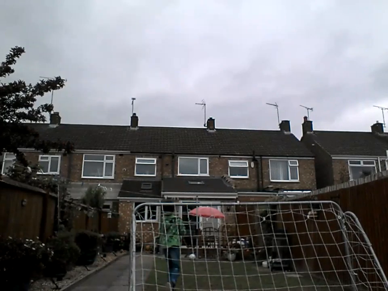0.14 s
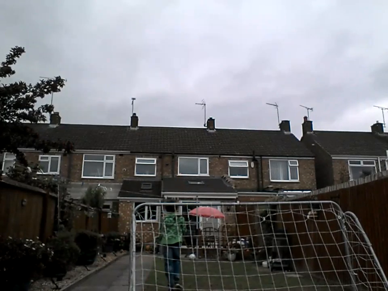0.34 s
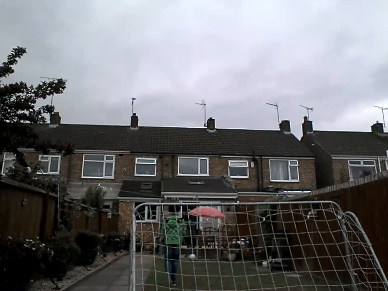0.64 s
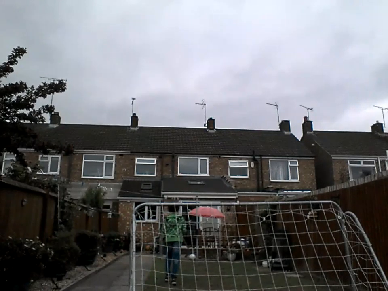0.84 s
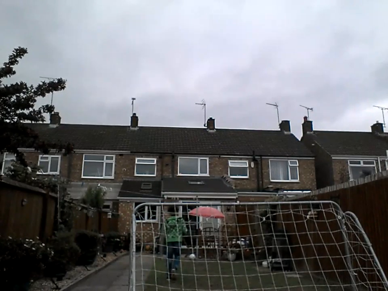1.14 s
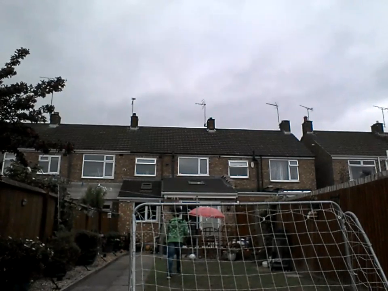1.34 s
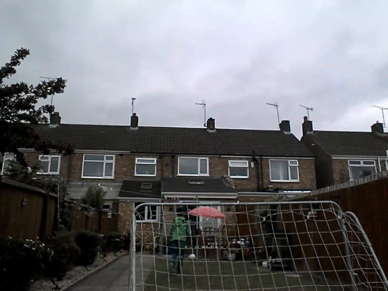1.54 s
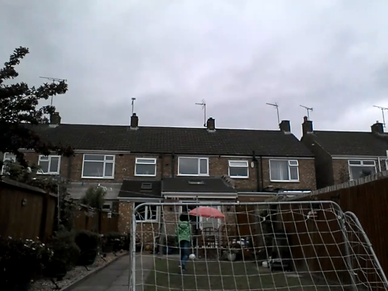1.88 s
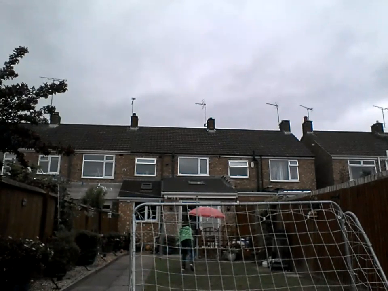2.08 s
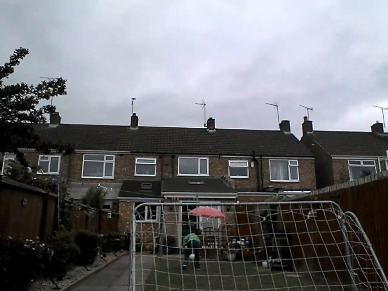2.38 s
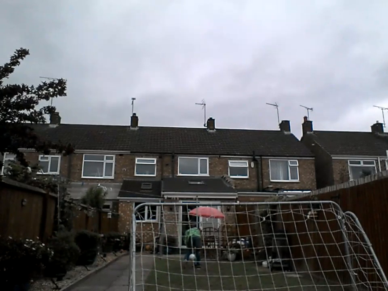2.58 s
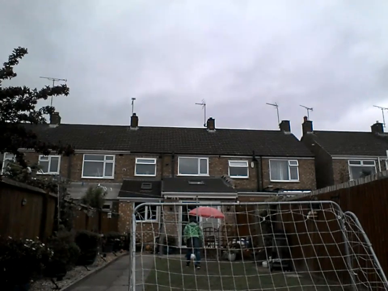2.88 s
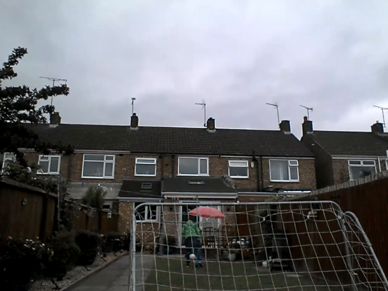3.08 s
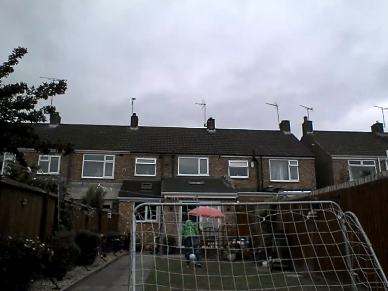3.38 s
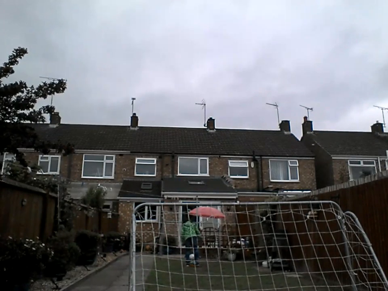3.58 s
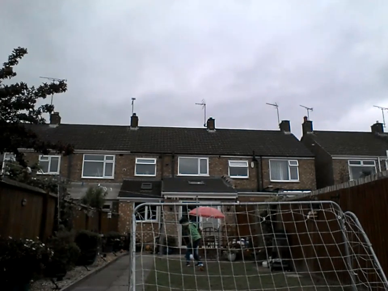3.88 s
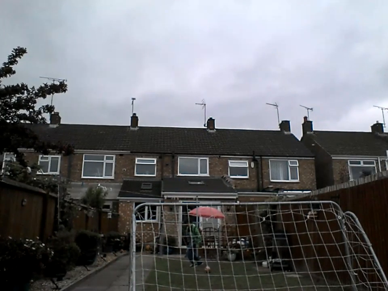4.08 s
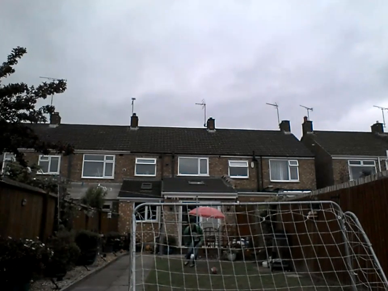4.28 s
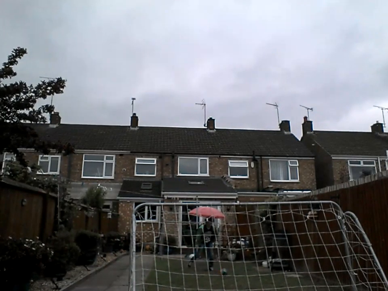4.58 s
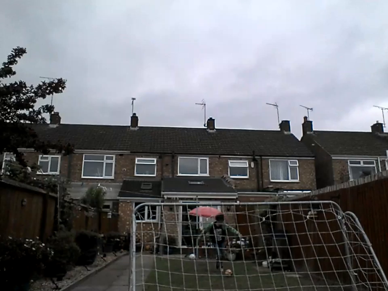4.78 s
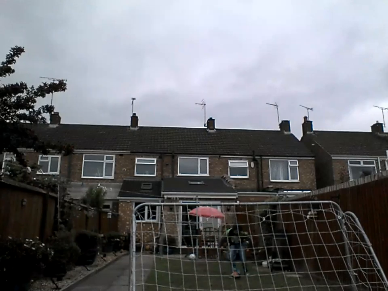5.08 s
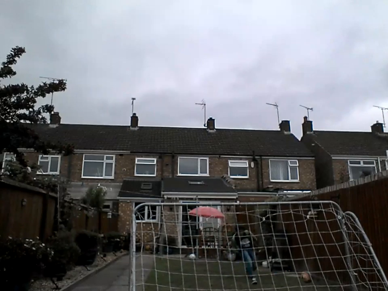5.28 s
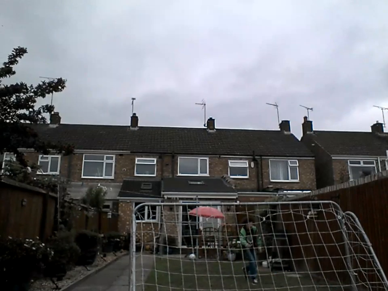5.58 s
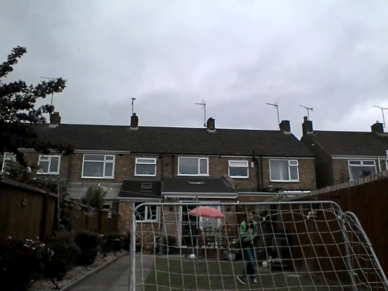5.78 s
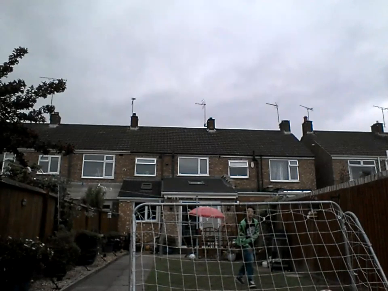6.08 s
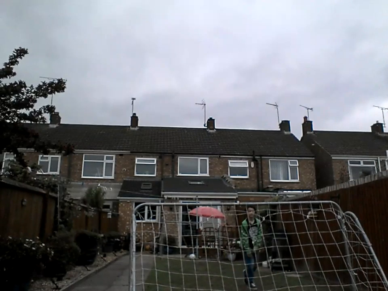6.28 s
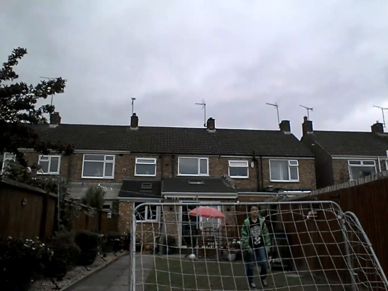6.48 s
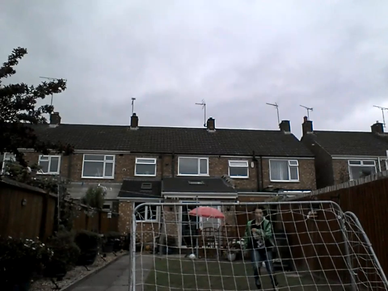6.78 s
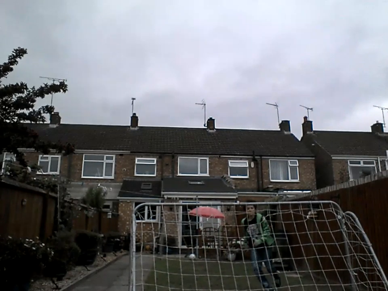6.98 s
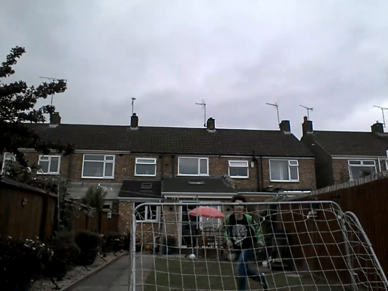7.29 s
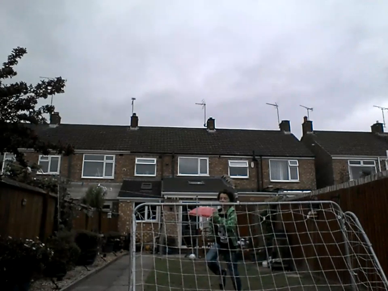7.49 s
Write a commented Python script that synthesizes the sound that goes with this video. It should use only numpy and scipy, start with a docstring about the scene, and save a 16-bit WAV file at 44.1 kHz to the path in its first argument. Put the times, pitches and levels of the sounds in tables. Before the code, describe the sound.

Sparrows chirp over quiet garden ambience, wind buffets the microphone hard, then a ball is kicked, bounces into a net, and light knocks follow.

```python
"""Football in a back garden

The microphone stands just behind the net of a small goal: shaped noise makes wind, traffic and hiss.
A gust buffets the microphone with pressure swings; then a ball is kicked, bounces and drops into the net.
Steps, ball and knocks are bursts of clicks; ball, ground and goal frame also ring as fading sine waves.
Sparrows are sliding whistles, a far vehicle is a stack of harmonics, and fences and house walls echo."""
import sys
import numpy as np
from scipy import signal
from scipy.fft import rfft, irfft, next_fast_len
from scipy.io import wavfile
from scipy.ndimage import uniform_filter1d

SR = 44100
rng = np.random.default_rng(int(sys.argv[2]) if len(sys.argv) > 2 else 0)


def digitize_waveform(pressure):
    """Quantize a signal to 16-bit integers and store it at the path in sys.argv[1].

    Rows of a 2-D input are taken as channels; values are limited to [-1, 1].
    """
    field = np.atleast_2d(pressure).T
    bounded = np.clip(field, -1, 1)
    quanta = np.round(bounded * 32767).astype(np.int16)
    wavfile.write(sys.argv[1], SR, quanta)


N = 336924
TIME = np.arange(N) / SR

# The ball's kick, bounces, net hit and drop, levels before the garden's echoes and filters:
# start_s [s], level_db [dB], hardness_db [dB], rise_s [s], thud_db [dB], thud_tilt_db [dB per octave]
BALL_HITS = [(5.2215, -42.5, -4.5, 0.0008, -31, -1), (5.445, -56, -5, 0.00044, -51, 10.5),
             (5.662, -50, -1.5, 0.0024, -59.5, 11), (5.7051, -42.5, 0.5, 0.00027, -34.5, -5.5),
             (6.397, -53.5, -3, 0.00084, -40, -1)]
# Knocks on the goal frame, before filters: start_s [s], level_db [dB], hardness_db [dB], rise_s [s]
FRAME_KNOCKS = [(6.769, -42.5, 6, 0.00027), (6.779, -53.5, -13.5, 0.0012), (7.031, -44, 1.5, 0.0031),
                (7.208, -51, 0.5, 0.0022), (7.252, -69, 9, 0.00043), (7.317, -55, 0.5, 0.0019)]


def from_db(db):
    """Turn decibels into gain."""
    return 10 ** (np.asarray(db) / 20)


def rms_one(x):
    """Scale to an rms (average strength) of 1."""
    return x / np.sqrt(np.mean(x ** 2) + 1e-20)


def add(out, start_s, sound):
    """Mix a sound in, starting at the given second."""
    at = max(round(start_s * SR), 0)
    out[at:at + len(sound)] += sound[:max(N - at, 0)]


def colour(x, spectrum):
    """Filter to a given spectrum without sounding early (minimum phase); white noise keeps its level."""
    size = next_fast_len(N + SR // 4) * 2
    hz, db = np.transpose(spectrum)
    bins_hz = np.fft.rfftfreq(size, 1 / SR)
    gain = rms_one(from_db(np.interp(np.log(bins_hz + 1), np.log(hz), db)))
    # Folding the cepstrum forward in time gives the minimum-phase filter.
    cepstrum = irfft(np.log(gain))
    cepstrum[1:size // 2] *= 2
    cepstrum[size // 2 + 1:] = 0
    return irfft(rfft(x, size) * np.exp(rfft(cepstrum)))[:N]


def drift(rate_hz, size):
    """Random curve of straight lines, with a new target rate_hz times a second and an rms of 1."""
    knots = rng.standard_normal(int(size / SR * rate_hz) + 2)
    return rms_one(np.interp(np.arange(size) * rate_hz / SR, np.arange(len(knots)), knots))


def evened(x, span_s):
    """Hold the level of noise near 1 by dividing by its rms over a sliding span."""
    return x / np.sqrt(uniform_filter1d(x ** 2, max(int(span_s * SR), 2)) + 1e-12)


def garden(x, echo_db, tail_db):
    """Add a few echoes off fences and walls, then a thin scattered tail from the houses."""
    # Echoes off walls and fences: delay_s [s], level_db [dB, before echo_db and the treble cut]
    echoes = [(0.013, -11), (0.03, -18), (.047, -19), (.083, -35)]
    t60_s, build_up_s = 0.76, 0.0051
    t = np.arange(SR) / SR
    fade = from_db(-60 * t / t60_s) * (1 - np.exp(-t / build_up_s))
    scatter = rng.standard_normal(SR) * fade
    response = from_db(tail_db) * scatter / np.linalg.norm(scatter)
    for delay_s, level_db in echoes:
        response[int(delay_s * SR)] += from_db(level_db + echo_db)
    response = signal.sosfilt(signal.butter(2, 6500, fs=SR, output="sos"), response)
    return x + signal.fftconvolve(x, response)[:N]


def ring(hz, db, t60_s, rise_s):
    """A damped mode: a sine wave that fades by 60 dB in t60_s, set going by a soft contact."""
    t = np.arange(int(t60_s * SR)) / SR
    fade = from_db(db - 60 * t / t60_s) * (1 - np.exp(-t / rise_s))
    return -fade * np.sin(2 * np.pi * hz * t)


def distant_traffic():
    """The blur of distant traffic is steady noise, weak in the treble."""
    # Spectrum of the traffic: pitch_hz [Hz], level_db [dB per Hz, relative]
    spectrum = [(100, -1.5), (200, 1), (400, 3.5), (650, 0), (1100, -7.5), (1800, -16.5), (3000, -22.5),
                (6000, -26.5)]
    return from_db(-72.5) * colour(rng.standard_normal(N), spectrum)


def microphone_hiss():
    """The microphone's own hiss is steady noise with an uneven treble."""
    # Spectrum of the hiss: pitch_hz [Hz], level_db [dB per Hz, relative]
    spectrum = [(2000, -7.5), (3300, -7.5), (4000, -0.5), (4550, 1.5), (5050, -13.5), (5650, -2),
                (6300, -17), (6850, -12), (7300, -9), (8200, -14.5), (11500, -13.5), (13500, -8),
                (15700, -7)]
    return from_db(-70) * colour(rng.standard_normal(N), spectrum)


def airflow():
    """Level (dB) and eddy rate (Hz) of the air: eddies come faster in stronger air."""
    # Light air on the microphone: time_s [s], level_db [dB, before the wind's trim]
    breeze = [(0, -61.5), (.17, -69), (1.45, -73.5), (1.75, -64), (3.28, -58), (3.38, -50.5), (3.58, -56.5),
              (3.65, -41.5), (3.72, -57.5), (4.75, -62.5), (5.45, -51), (6, -58.5), (7.1, -60.5),
              (7.5, -63)]
    # Two gusts, one curve each: time_s [s], level_db [dB, before the wind's trim]
    gusts = [
        [(1.96, -56.5), (2.07, -45), (2.15, -53), (2.19, -58), (2.27, -58.5), (2.33, -40), (2.45, -52),
         (2.5, -36), (2.56, -37), (2.6, -45), (2.71, -37), (2.78, -46), (2.92, -39.5), (2.98, -57)],
        [(3.76, -51.5), (3.8, -41.5), (3.86, -40), (3.91, -44), (3.945, -39.5), (4.02, -41), (4.08, -37.5),
         (4.13, -26.5), (4.195, -25.5), (4.22, -36), (4.255, -30.5), (4.315, -43.5), (4.42, -32), (4.51, -50.5),
         (4.72, -60.5)],
    ]
    calm_eddy_hz = 63
    gust_eddy_hz, gust_db = [101, 186], -38   # eddy rate of each gust at gust_db, on top of the calm
    eddy_power = 0.44   # how steeply that rate grows with the pressure
    db = np.interp(TIME, *np.transpose(breeze))
    quickness = gust_eddy_hz[0]   # the breeze shares the first gust's rate
    for curve, rate_hz in zip(gusts, gust_eddy_hz):
        curve_db = np.interp(TIME, *np.transpose(curve), left=-np.inf, right=-np.inf)
        quickness = np.where(curve_db > db, rate_hz, quickness)
        db = np.maximum(db, curve_db)
    return db, np.hypot(calm_eddy_hz, quickness * from_db(eddy_power * (db - gust_db)))


def wind(air_db, eddy_hz, corner_ratio=1.24, steepness=3.95, lumpy_db=3.5, low_cut_hz=26,
         flutter_db=1.05, trim_db=-0.6):
    """Turbulent pressure on the port: flat up to about the eddy rate, then falling steeply."""
    flutter = np.tanh(drift(120, N))
    corner_hz = corner_ratio * eddy_hz * from_db(lumpy_db * flutter)
    white, out = rng.standard_normal((2, N)), np.zeros(N)
    edges_hz = 20 * 2 ** (np.arange(16) / 2)   # half-octave bands
    for k, (low, high) in enumerate(zip(edges_hz, edges_hz[1:])):
        band_filter = signal.butter(4, [low, high], "band", fs=SR, output="sos")
        band = signal.sosfilt(band_filter, white[k % 2])   # neighbours use separate noise
        hz = np.sqrt(low * high)
        treble_fall = 1 + (hz / corner_hz) ** (2 * steepness)
        bass_fall = 1 + (low_cut_hz / hz) ** 4
        out += band / np.sqrt(treble_fall * bass_fall)
    return evened(out, 0.037) * from_db(air_db + flutter_db * flutter + trim_db)


def contacts():
    """List steps, ball and knocks: start, levels of three parts, t60, rise; hardness trades body for snap."""
    # Footsteps on the grass: start_s [s], level_db [dB, before echoes and filters]
    steps = [(.014, -61), (.44, -66), (0.897, -68.5), (1.335, -62.5), (3.796, -66.5), (4.966, -63.5),
             (5.128, -60.5), (5.205, -55), (6.158, -58), (7.397, -62.5)]
    # Part levels are dB for body, slap and snap.
    step_parts_db, step_t60_s, step_rise_s = [0.5, -1.5, 1.5], 0.14, 0.0038
    ball_parts_db, ball_t60_s = [0.5, -3.5, -1], 0.1
    knock_parts_db, knock_t60_s = [-5, -1, 0.5], 0.032
    harder = np.array([-1, 0, 1])
    rows = [(s, db + np.array(step_parts_db), step_t60_s, step_rise_s) for s, db in steps]
    for s, db, hard_db, rise_s, *_ in BALL_HITS:
        rows.append((s, db + hard_db * harder + ball_parts_db, ball_t60_s, rise_s))
    for s, db, hard_db, rise_s in FRAME_KNOCKS:
        rows.append((s, db + hard_db * harder + knock_parts_db, knock_t60_s, rise_s))
    return rows


def hits(first_click=8.5, grain=0.35):
    """Each contact is a dying crush of tiny clicks in three parts; a slow rise softens its first crack."""
    # Hollow body of a contact: pitch_hz [Hz], level_db [dB per Hz, relative]
    body = [(100, -24), (200, -4), (350, 0.5), (650, -0.5), (1000, -5), (1500, -40), (3000, -56)]
    # Slap of a contact: pitch_hz [Hz], level_db [dB per Hz, relative]
    slap = [(500, -33), (900, -1.5), (1100, -1), (1400, 1), (1700, 2), (2000, 3), (2450, -2.5), (3000, -1),
            (5000, -34.5)]
    # Hard snap of a contact: pitch_hz [Hz], level_db [dB per Hz, relative]
    snap = [(1800, -44), (3000, -15), (3600, -5.5), (4200, 3.5), (4900, -8), (5700, -12), (6600, -17),
            (9000, -24), (15000, -36.5)]
    out, t = np.zeros(N), np.arange(1, SR // 4) / SR
    for part, spectrum in enumerate((body, slap, snap)):
        force = np.zeros(N)
        for start_s, levels_db, t60_s, rise_s in contacts():
            click_sizes = np.exp(grain * rng.standard_normal(len(t)))
            crush = evened(rng.standard_normal(len(t)) * click_sizes, 0.016)
            crush[SR // 5000] = first_click   # about 0.2 ms in
            fade = from_db(levels_db[part] - 60 * t / t60_s) * (1 - np.exp(-t / rise_s))
            add(force, start_s, crush * fade)
        out += colour(force, spectrum)
    return out


def note(length_s, pitches_hz, flutter_db=3.5):
    """One whistle sliding through three pitches, with a level flutter and a burr wider on longer notes."""
    size = int(length_s * SR)
    u = np.linspace(0, 1, size)
    burr = .8 * min(length_s, .08)
    glide_hz = np.polyval(np.polyfit([0, .5, 1], pitches_hz, 2), u)
    hz = glide_hz * (1 + burr * drift(700, SR // 4)[:size])
    swell = np.sqrt(np.abs(np.sin(np.pi * u))) * from_db(flutter_db * drift(200, SR // 4)[:size])
    return swell * np.sin(2 * np.pi * np.cumsum(hz) / SR)


def calls(rows, notes, spread=0.0243):
    """Sing one kind of sparrow call at each row's time, pitch and level; no two notes bend quite alike."""
    out = np.zeros(N)
    for start_s, hz, db in rows:
        for delay_s, length_s, *ratios, note_db in notes:
            bend = 1 + spread * (2 * rng.random(len(ratios)) - 1)
            add(out, start_s + delay_s, from_db(db + note_db) * note(length_s, hz * np.array(ratios) * bend))
    return out


def sparrows(flock_db=-76, count=48, birds_db=-1.5, near_db=-1.0):
    """One bird chips close by, others chirrup and cheep in the hedges, and the flock twitters at random."""
    # Calls of each kind: start_s [s], pitch_hz [Hz], level_db [dB, before echoes, trims and filters]
    chirrups = [(.277, 5100, -66.5), (1.02, 5430, -65.5), (1.262, 4700, -63), (1.82, 5510, -69),
                (2.37, 5050, -63.5), (3.435, 5070, -72.5), (3.96, 4950, -65), (5.094, 5037, -65.5),
                (6.275, 5120, -61.5), (7.37, 5450, -65), (7.49, 4660, -62)]
    cheeps = [(1.02, 3150, -73.5), (1.28, 3580, -67), (2.05, 3600, -68.5), (2.98, 3600, -67.5),
              (3.733, 3410, -71), (4.601, 3910, -67), (4.838, 3610, -66.5), (5.45, 3870, -70.5),
              (6.5, 3650, -67.5), (6.59, 3550, -71), (7.053, 4750, -66), (7.42, 4280, -66.5)]
    chips = [(.445, 3960, -61), (1.09, 5000, -66), (1.41, 5030, -70), (1.5, 4850, -69), (1.885, 4740, -66),
             (2.315, 5370, -64.5), (2.835, 5050, -65), (2.92, 4640, -62), (4.05, 6700, -71),
             (4.088, 5350, -61), (4.18, 4700, -57.5), (4.46, 5100, -64), (4.547, 4880, -59),
             (6.985, 5470, -61), (7.335, 6850, -67)]
    # Notes in a call: delay_s [s], length_s [s], first, middle and last pitch [ratios],
    # level_db [dB, relative to the call]
    chirrup_notes = [(0, .048, 1.02, 0.9, 0.7, 2), (.056, .065, .8, .73, .68, -9)]
    cheep_notes = [(0, .125, 1.11, 0.95, 1, 0)]
    chip_notes = [(0.0014, .046, .72, 1.03, .78, 0)]
    hedges = calls(chirrups, chirrup_notes) + calls(cheeps, cheep_notes)
    for when, length, *pitches in rng.random((count, 5)):
        twitter = note(0.038 + 0.046 * length, 3300 + 2500 * np.array(pitches))
        add(hedges, when * N / SR, from_db(flock_db) * twitter)
    # The hedges are some way off, so much of their song arrives scattered.
    far = garden(hedges, echo_db=4.0, tail_db=-1.0)
    near = garden(calls(chips, chip_notes), echo_db=1.0, tail_db=-7.0)
    birds = from_db(birds_db) * far + from_db(near_db) * near
    return signal.lfilter(*signal.iirpeak(4100, 1.9, fs=SR), birds)   # the microphone favours about 4 kHz


def buffets(air_db, eddy_hz, level_db=-1.5, swiftness=0.51):
    """A vortex passing the port is one swing of pressure, up then down, as brief as the eddy is fast."""
    # Strongest eddies: centre_s [s], peak_db [dB, before level_db], eddy_rate_hz [Hz, before swiftness]
    strong = [(.437, -48, 79), (2.068, -37.5, 110), (2.148, -36, 170), (2.233, -27, 87), (2.361, -30, 112),
              (2.511, -30, 130), (2.673, -29, 150), (2.704, -32.5, 189), (2.935, -31, 122),
              (3.438, -40, 69), (3.846, -19, 158), (3.87, -25.5, 231), (3.974, -29, 240), (4.1, -14, 260),
              (4.129, -15.5, 470), (4.175, -26, 650), (4.181, -16.5, 500), (4.192, -16.5, 400),
              (4.24, -20.5, 290), (4.28, -26.5, 440), (4.394, -27, 267), (4.422, -21.5, 324),
              (4.442, -30.5, 460), (4.477, -25, 110), (4.566, -37.5, 80), (5.09, -44, 78), (6.288, -46, 80),
              (6.547, -40, 94), (7.13, -44.5, 89), (7.2, -38, 59.4)]
    # Weaker ones come at random: peak above the wind's level, and speed against its eddy rate.
    eddies_per_s, eddy_peak_db, eddy_spread_db, eddy_speed = 13, 5.5, 5.5, 1.12
    at = np.flatnonzero(rng.random(N) < eddies_per_s / SR)
    peak_db = air_db + eddy_peak_db + eddy_spread_db * (2 * rng.random(N) - 1)
    weak = zip(TIME[at], peak_db[at], eddy_speed * eddy_hz[at])
    out = np.zeros(N)
    for centre_s, db, hz in [*strong, *weak]:
        half = int(3 * SR / hz)
        # distance along its path, in core radii
        u = 2 * np.pi * hz * swiftness * np.arange(-half, half) / SR
        swing = -u / (1 + u * u) ** 2 * np.hanning(2 * half)
        add(out, centre_s - half / SR, from_db(db + level_db) * swing / swing.max())
    return out


def scuffs(width=0.18, overtone_db=-13.0):
    """A sole sliding on turf: a soft swell of noise around one resonance and its octave, with gritty hiss."""
    # Shoes brushing the turf: start_s [s], length_s [s], resonance_hz [Hz],
    # level_db [dB, before echoes and the treble cut], hiss_db [dB above level_db]
    brushes = [(0.548, 0.21, 1670, -76.5, -20), (4.609, 0.13, 1610, -67, -5),
               (5.233, 0.15, 2050, -62.5, -5.5), (5.862, 0.51, 1840, -75, -6),
               (7.044, 0.12, 2370, -66, 1.5), (7.485, 0.14, 2220, -73, 9.5)]
    hiss_filter = signal.butter(3, [3300, 5000], "band", fs=SR, output="sos")
    out = np.zeros(N)
    for start_s, length_s, hz, db, hiss_db in brushes:
        size = int(length_s * SR)
        white = rng.standard_normal(size)
        low = rms_one(signal.lfilter(*signal.iirpeak(hz, 1 / width, fs=SR), white))
        octave = rms_one(signal.lfilter(*signal.iirpeak(2 * hz, 2 / width, fs=SR), white))
        hiss = rms_one(signal.sosfilt(hiss_filter, rng.standard_normal(size)))
        friction = low + from_db(overtone_db) * octave + from_db(hiss_db) * hiss
        add(out, start_s, from_db(db) * np.sin(np.linspace(0, np.pi, size)) * friction)
    return signal.sosfilt(signal.butter(2, 7000, fs=SR, output="sos"), out)


def thuds(lag_s=0.00389):
    """The low ring of ball and ground after each blow; a glancing one favours the higher modes."""
    # Ring of ball and ground: pitch_hz [Hz], level_db [dB, relative to the thud], t60_s [s]
    modes = [(76, -2.5, 0.14), (109.4, 1, 0.16), (167, -1, 0.073), (270, -4.5, 0.067)]
    lowest_hz = modes[0][0]
    out = np.zeros(N)
    for start_s, *_, thud_db, tilt_db in BALL_HITS:
        for hz, mode_db, t60_s in modes:
            level_db = thud_db + mode_db + tilt_db * np.log2(hz / lowest_hz)
            add(out, start_s + lag_s, ring(hz, level_db, t60_s, rise_s=0.0011))
    return out


def engine(wobble=0.00657, fading_db=4.0, trim_db=-4.5):
    """A far vehicle picks up speed; each firing harmonic fades on its own on the way over the roofs."""
    # Course of the engine: time_s [s], firing_rate_hz [Hz, before wobble], level_db [dB, before trim_db]
    course = [(5.3, 88, -74), (5.8, 93, -65), (6.3, 100, -64), (6.8, 103, -63), (7.15, 104, -78)]
    # Harmonics from the second upwards: level_db [dB, relative, before fading]
    harmonics_db = [-8, -4, -8, -13, -14]
    time_s, rate_hz, level_db = np.transpose(course)
    firing_hz = np.interp(TIME, time_s, rate_hz) * (1 + wobble * drift(13, N))
    phase = 2 * np.pi * np.cumsum(firing_hz) / SR
    hum = np.zeros(N)
    for order, db in enumerate(harmonics_db, 2):
        hum += np.sin(order * phase) * from_db(db + fading_db * drift(10, N))
    return hum * np.interp(TIME, time_s, from_db(level_db + trim_db), left=0, right=0)


def frame():
    """The tubes of the goal ring briefly after a knock; a soft knock sets them going slowly."""
    # Ring of the tubes: pitch_hz [Hz], level_db [dB, relative to the knock], t60_s [s]
    modes = [(1060, -6.5, 0.041), (1670, -6, 0.033), (2456, 0.5, 0.028), (5520, 1.5, 0.018),
             (6600, -0.5, 0.014)]
    out = np.zeros(N)
    for start_s, db, _, rise_s in FRAME_KNOCKS:
        for hz, mode_db, t60_s in modes:
            add(out, start_s, ring(hz, db + mode_db, t60_s, rise_s))
    return out


def scene():
    """Play and birds in the garden, wind on the microphone, a quiet town beyond."""
    play = garden(hits() + frame() + scuffs(), echo_db=-2.0, tail_db=-11.0)
    play += garden(thuds(), echo_db=2.0, tail_db=-11.5)
    town = distant_traffic() + engine()
    air_db, eddy_hz = airflow()
    air = wind(air_db, eddy_hz) + buffets(air_db, eddy_hz)
    return (play + sparrows() + town + air + microphone_hiss())[None]


def record(dry):
    """Cut the top steeply above 15.8 kHz with an elliptic low-pass filter."""
    return signal.sosfilt(signal.ellip(10, .2, 70, 15800, fs=SR, output="sos"), dry)


dry = scene()
out = record(dry)
digitize_waveform(out)
```